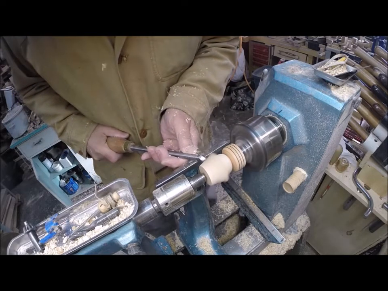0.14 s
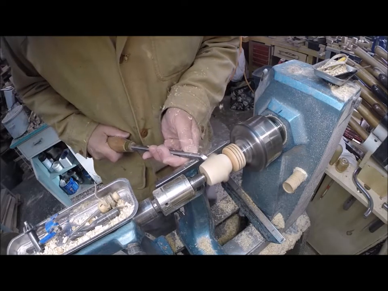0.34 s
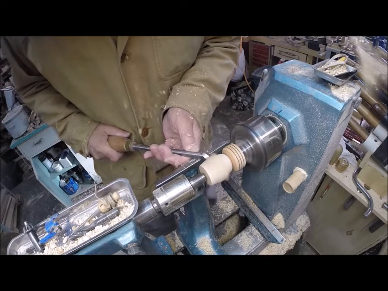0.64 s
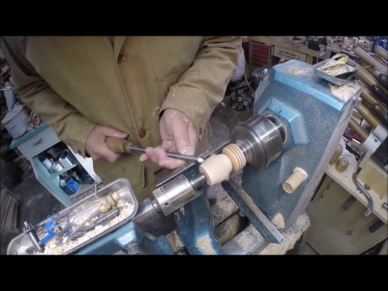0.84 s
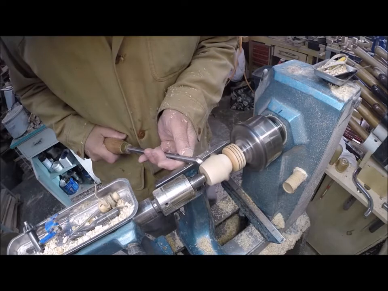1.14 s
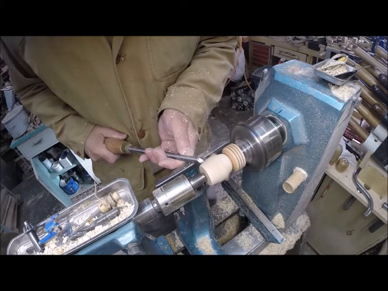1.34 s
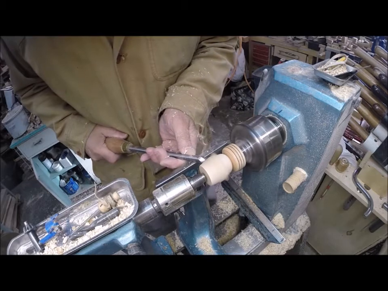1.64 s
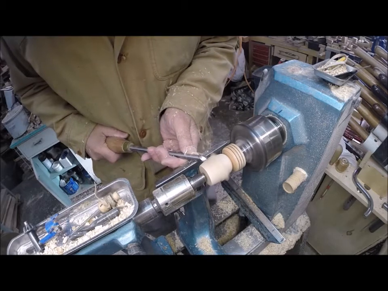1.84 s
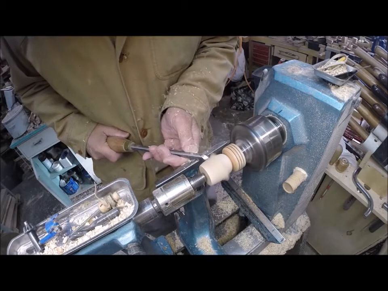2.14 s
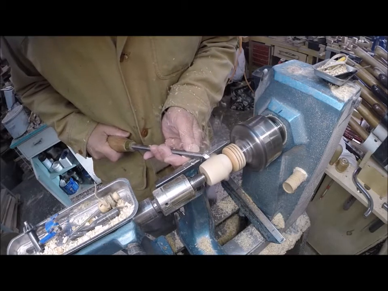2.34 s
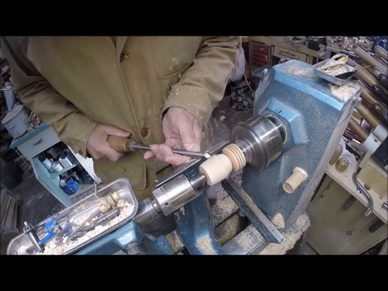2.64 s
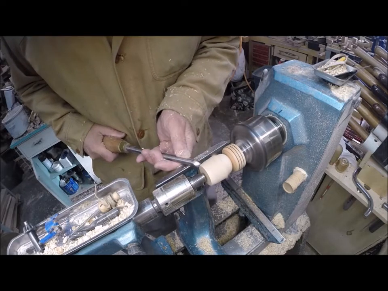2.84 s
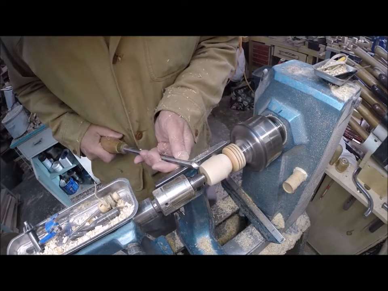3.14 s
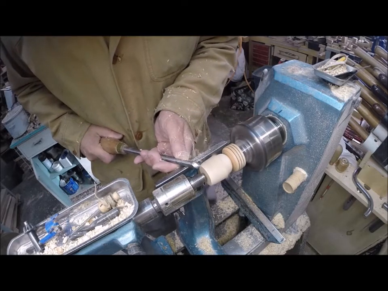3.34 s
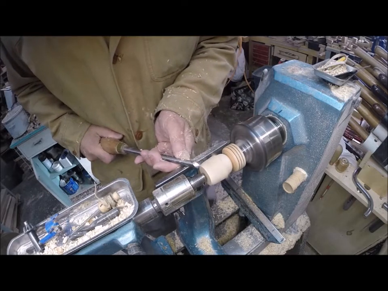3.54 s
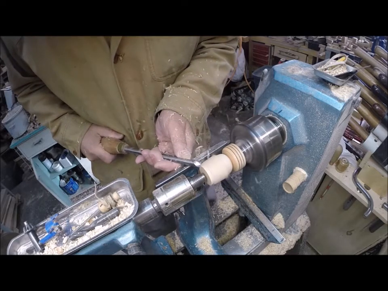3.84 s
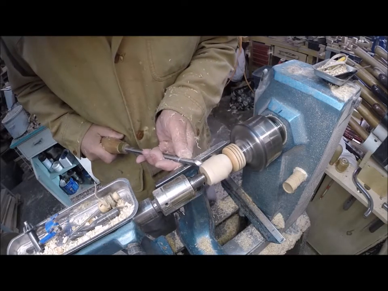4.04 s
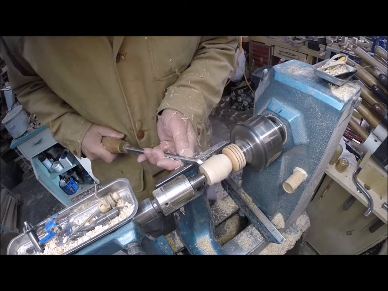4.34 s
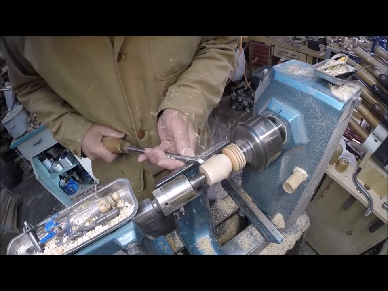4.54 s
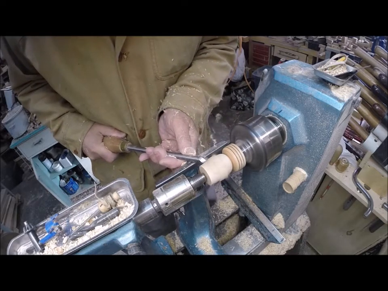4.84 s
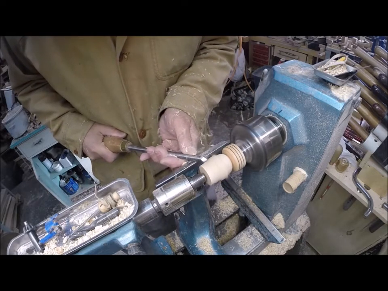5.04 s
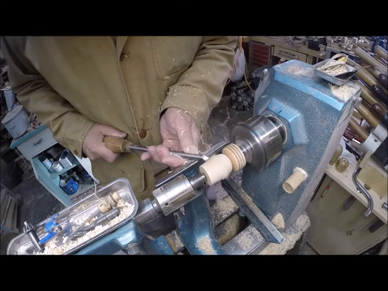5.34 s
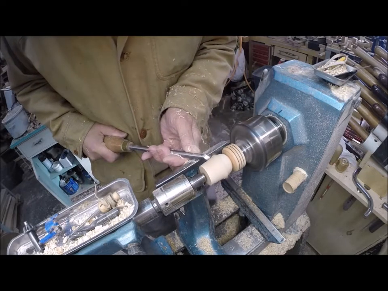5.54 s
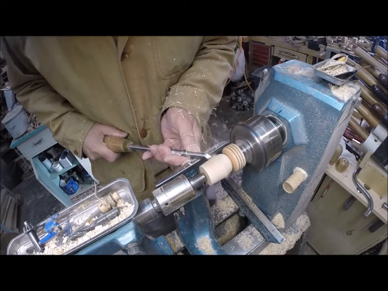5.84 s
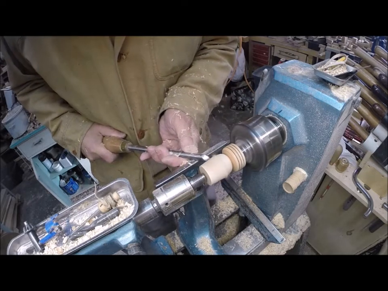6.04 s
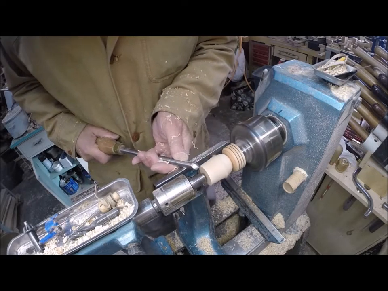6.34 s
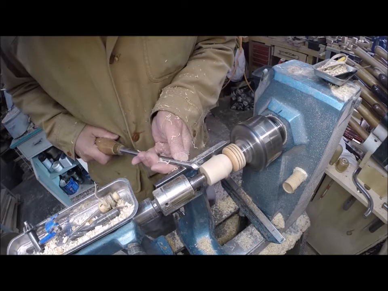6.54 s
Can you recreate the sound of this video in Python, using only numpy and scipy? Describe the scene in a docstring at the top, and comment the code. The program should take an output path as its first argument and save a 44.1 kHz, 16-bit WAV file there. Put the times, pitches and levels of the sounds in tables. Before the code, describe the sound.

Close by in a small workshop, a steel turning tool scrapes into spinning wood with a bright, rapidly pulsing rasp. A brief first cut is followed by a longer one that builds, then a long, sustained third. Each loads the lathe into a low drone and makes the steel ring faintly. Light scuffs and taps of the tool on its rest follow the cuts, while the motor hums and the bearings whirr throughout.

```python
"""A hand-held steel tool takes three cuts from a blank spinning on a wood lathe.
Fibres tear in bursts on every turn and ring the tool and its rest; the load makes the machine drone.
Between cuts the tool is drawn back and knocks on the rest; it also rubs, light and bright, between cuts
and as a cut begins. The tool sounds in a small workshop, over motor hum, bed rumble and bearing whirr."""
import sys
import numpy as np
from scipy import signal
from scipy.fft import rfft, irfft
from scipy.io import wavfile
from scipy.ndimage import uniform_filter1d

SR = 44100
rng = np.random.default_rng(int(sys.argv[2]) if len(sys.argv) > 2 else 0)


def wrap_up_sound(samples):
    """Save the sound to the file named by the first command line argument, as 16-bit audio."""
    columns = np.atleast_2d(samples).T
    # keep every value between -1 and 1, then stretch to whole-number steps
    tamed = np.clip(columns, -1, 1)
    steps = np.round(tamed * 32767).astype(np.int16)
    wavfile.write(sys.argv[1], SR, steps)


N = 294588
T = np.arange(N) / SR
HZ = np.fft.rfftfreq(N, 1 / SR)
TURN_SAMPLES = 1125
SPINDLE_HZ = SR / TURN_SAMPLES
FIRM_DB = -30  # scrape level that stands for firm pressure

# Table levels are relative. x3: one column per cut.
# hand pressure as scrape level, one list per cut: t/s, level/dB
PRESSURE = [
    [(0.0, -42.5), (0.138, -40), (0.416, -32), (0.468, -26.5), (0.594, -31), (0.63, -38.5), (0.668, -40),
     (0.697, -32.5), (0.715, -47.5), (0.77, -58)],
    [(1.06, -57), (1.12, -47), (1.4, -41.5), (1.486, -35.5), (1.832, -32.5), (2.38, -31.5), (2.506, -27),
     (2.556, -36), (2.626, -27.5), (2.73, -60)],
    [(3.29, -53), (3.33, -42.5), (3.5, -34), (3.56, -37), (4.13, -28.5), (5.21, -28), (5.53, -31),
     (5.92, -32), (6.05, -47), (6.1, -63)],
]
# cuts at firm pressure: low rasp/dB, top fizz/dB, drone/dB, high side/turns, opposite bite/dB
CUTS = [(-9.4, -14, -35.4, .1, -6), (-13.6, -17, -35.6, -.028, -6), (-14.6, -18, -37.5, -.115, 0)]
# spectrum of tearing wood: f/Hz, level/dB x3
TEAR_SPECTRUM = [(190.0, -6, -17, -47), (397, -3, -16.5, -16.5), (550.0, -16.5, -16.5, -20),
                 (854, -15.5, -13, -20), (950, -5.5, -7, -10.5), (1730, -3.5, -5, -7.5),
                 (3000.0, 4.5, 0.5, 3.0), (4400.0, 1, -1.5, -0.5), (6570, 1.5, 0.5, 0.5),
                 (7860, -4.5, -7.0, -6.5), (9930, -15, -16.5, -13.5), (11770, -26, -25.5, -24.5),
                 (12800.0, -20.5, -21, -19), (14400.0, -31.5, -32.0, -33), (15200.0, -23.5, -35, -36)]
# resonances and notches of tool and rest: f/Hz, width/Hz, gain/dB x3
STEEL_MODES = [(669, 52, 8, 1.5, 4.5), (1403, 280, 3, 3.5, 5), (1939, 143, 6, 7.5, 9),
               (2144, 120, -4.5, -3.5, -3.5), (2579, 98, 7.5, 11, 10), (2949, 105, 3.5, 4, 2),
               (3330, 247, 4, 6.5, 3.5), (3715, 154, 6.5, 8, 7), (3960, 96, 8.5, 6.5, 8),
               (4276, 134, 4.5, 10, 11), (4569, 280, 9, 12.5, 14), (4862, 136, 5, 3.5, 6),
               (5309, 168, 3, 5.5, 6.5), (5745, 168, 3, 7, 11), (5980, 182, 10.5, 11.5, 11),
               (6390, 245, 7, 8, 2.5), (7114, 294, 6.5, 5, 3.5), (7870, 260, -1, 2, 5),
               (8478, 240, -10, -11, -10.5), (9049, 460, 12, 8.5, 6), (10747, 980, 9, 6.5, 7),
               (13728, 675, 11, 10, 11.5)]
# scrape that recurs each turn: f/Hz, power share/1
GRAIN_REPEAT = [(300, .85), (1300, .72), (2000, .34), (3500, .22), (6000, .2), (12000, .14)]
# colour change as the tool travels along the wood: low f/Hz, high f/Hz, change/dB x3
TRAVEL_BANDS = [(1785, 2200, -0.5, 4.5, 9.5), (2950, 3800, -2, -6, -6), (7050, 8500, -1, 0, -5),
                (13300, 14500, -4, 4, -9)]
# edge catches hard grain: t/s, level/dB
CATCHES = [(0.383, -15.5), (0.4348, -15), (0.4604, -13), (0.4862, -13), (0.5114, -17), (0.588, -17),
           (0.666, -17.5), (1.4515, -20), (1.758, -13.5), (1.81, -16), (1.834, -13), (1.8602, -12.5),
           (1.8861, -16), (1.9365, -14.5), (2.0898, -13.5), (2.141, -13.5), (2.166, -15.5), (2.1923, -15),
           (2.243, -14), (2.269, -15.5), (2.345, -15), (2.3965, -13), (2.4728, -10.5), (2.498, -15),
           (2.5995, -15), (2.6259, -12.5), (4.128, -15), (4.472, -14), (4.538, -11.5), (4.562, -11),
           (4.742, -15), (4.87, -13.5), (5.0225, -13), (5.0737, -13), (5.099, -12.5), (5.4043, -13.5),
           (5.7094, -15)]
# scrape thins to ringing notes: centre t/s, length/s, note level/dB
THIN_SPELLS = [(.613, .026, -35), (.666, .04, -33), (2.575, .036, -33)]
# those notes: f/Hz, level/dB
RING_NOTES = [(2300, -9), (2580, -4), (2960, -8), (3460, -9), (3730, -6), (4665, -4), (5570, -8), (6010, 0),
              (6340, -2), (7170, -10)]
# tool rubs: t/s, length before release/s, level/dB, rise/s, kind ("draw": drawn back; else bright rub)
RUBS = [(0.753, 0.15, -42, 0.054, "draw"), (2.83, 0.076, -42, 0.008, "draw"),
        (3.109, 0.5, -46, .007, "push"), (6.344, 0.07, -51, 0.018, "push"),
        (6.525, 0.11, -40, 0.013, "push")]
# spectrum of the tool drawn back: f/Hz, level/dB
DRAW_SPECTRUM = [(240, -20), (400, -10), (534, -13), (780, -16.5), (1230, -7.5), (2360, -6), (3010, 1.5),
                 (3770, -2), (5190, -16.5), (5600, -5), (6040, -28), (7130, -13), (15000, -41)]
# spectrum of the tool's light, bright rubbing: f/Hz, level/dB
BRIGHT_RUB_SPECTRUM = [(240, -50), (400, -20), (425, -11), (602, -12), (650, -12), (1410, -3), (1610, -5),
                       (2000, 1), (2250, -5), (3010, 2.5), (4460, 3), (7930, -7.5), (8560, -20),
                       (10400, -14.5), (15000, -39)]
# tool knocks on the rest: t/s, level/dB, centre f/Hz
KNOCKS = [(0.821, -24, 3000), (2.8888, -29.5, 3460), (3.122, -23, 4400), (6.266, -29.5, 3240),
          (6.411, -28, 4250)]
# other spindle orders at median load: order/1, level re drone/dB x3
LOAD_ORDERS = [(2, -33, -26, -31), (3, -32, -32, -30), (5, -28, -28, -28), (6, -29, -28, -33),
               (7, -35, -36, -36), (9, -20, -28, -21), (10, -37, -31, -35), (11, -49, -44, -44),
               (13, -41, -39, -37), (17, -33, -43, -36)]
# envelope of the drone's octave: t/s, level/dB
OCTAVE_LEVELS = [(0, -54), (.3, -47), (.5, -44), (.8, -63), (1.15, -62), (1.9, -50.5), (2.55, -48),
                 (2.8, -66), (3.1, -64), (3.22, -52.5), (3.7, -52), (3.9, -58), (4.25, -49), (5.3, -50),
                 (5.8, -53), (6.05, -66), (6.45, -62), (6.6, -55)]
# spectrum of the shaken headstock: f/Hz, level/dB
GROWL_SPECTRUM = [(60, -60), (130, -10), (165, 2.5), (215, -6), (260, -11.5), (300, 6.5), (345, -5.5),
                  (400, -22), (600, -25), (1200, -49)]
# tool digs in: centre t/s, length/s, growl level/dB
DIGS = [(.55, 0.6, -47.5), (2.59, 0.22, -46), (4.947, .7, -62)]
# motor, belt and spindle tones: f/Hz, level/dB, waver/1
IDLE_TONES = [(39.2, -54, .2), (60, -65, .3), (68.2, -66, .2), (79.9, -61, .44), (117.6, -57, .15),
              (120, -62, .2), (135.7, -62, .1), (297, -60, .9), (325.6, -58.5, .12)]
# spectrum of the bed's rumble: f/Hz, level/dB
RUMBLE_SPECTRUM = [(8, -12), (18, 1), (40, -3), (64, 1), (140, -2), (210, -9), (270, -8), (300, -1),
                   (335, -7), (390, -14), (560, -22), (1200, -55)]
# spectrum of bearings and fan: f/Hz, level/dB
WHIRR_SPECTRUM = [(240, -12), (400, -7), (841, -6.5), (921, -2), (1020, -13), (1290, -4), (1520, -6.5),
                  (2030, -4), (2150, -9), (2580, 5.5), (4010, -9.5), (5770, -3), (8180, -20), (9090, -18.5),
                  (15000, -27)]


def cutting(level_db=.4, rub_db=-1, chips_db=-9, catch_db=-10.5, flicker_db=3, sharpen=.42):
    """The bevel rubs all round the turn; chips part in bursts that drive the steel's resonances hard."""
    grain, depth = wood_grain(), bite()
    hand_tremble_db = drift(hz=29.8)
    rub = gain_of(rub_db + hand_tremble_db) * grain * evened(depth ** .33)
    # bands flicker apart: each chip favours its own resonances
    edges_hz = (2700, 3550, 4100, 4420, 5100, 5860, 6200, 6750, 8400, 12000, SR)
    parting = wood_grain()
    chips = sum(band(parting, lo, hi) * evened(depth * gain_of(flicker_db * drift(hz=80)))
                for lo, hi in zip(edges_hz, edges_hz[1:]))
    snaps = band(rng.standard_normal(N), 2000, SR) * bursts(CATCHES, rise_s=.0015, decay_s=.0035)
    sway_db = .3 * drift(hz=4.5)
    thinning = 1 - .75 * sum(spell(at_s, length_s) for at_s, length_s, _ in THIN_SPELLS)
    treble_shelf_db = -6 / (1 + (3000 / (HZ + 1)) ** 4)
    out = np.zeros(N)
    for cut, (rows, (rasp_db, fizz_db, *_)) in enumerate(zip(PRESSURE, CUTS)):
        press_db, during = pressure(rows)
        body_db = spectrum(TEAR_SPECTRUM, cut + 1) + steel_db(cut)
        driven_db = body_db + sharpen * steel_db(cut)
        bevel = colour(rub, body_db + treble_shelf_db)
        scrape = tool_travel(bevel + gain_of(chips_db) * colour(chips, driven_db), cut)
        out += gain_of(level_db) * stroke(scrape, press_db + sway_db, during, rasp_db, fizz_db) * thinning
        filter_rms = np.sqrt(np.mean(gain_of(driven_db) ** 2))
        out += gain_of(catch_db) * colour(snaps * during, driven_db) / filter_rms
    return out


def wood_grain(memory=.88):
    """The edge meets nearly the same grain each turn, giving lines at the spindle orders."""
    snaps = fractures(per_s=7000, spread_db=3.5, dust=.81)
    turns = np.resize(snaps, (N // TURN_SAMPLES + 1, TURN_SAMPLES))
    recurring = signal.lfilter([1], [1, -memory], turns, axis=0)
    recurring = (recurring / recurring.std(axis=1, keepdims=True)).ravel()[:N]
    fresh = fractures(per_s=9000, spread_db=2, dust=.9)
    share = spectrum(GRAIN_REPEAT)
    return irfft(rfft(recurring) * np.sqrt(share) + rfft(fresh) * np.sqrt(1 - share), N)


def fractures(per_s, spread_db, dust):
    """Tiny snaps of uneven size in a haze of dust."""
    sizes = gain_of(spread_db * np.minimum(rng.exponential(1, N), 3)) * rng.choice([-1, 1], N)
    snaps = evened(sizes * (rng.random(N) < per_s / SR))
    return evened(snaps + dust * rng.standard_normal(N))


def bite(side_grain=.23, opposite=.63, uneven_db=1.5, belt_yield_turns_per_db=.007):
    """Cut depth: the edge bites end grain twice a turn, most on the high side, and skims the low side."""
    angle_turns, opposite_db = T * SPINDLE_HZ, np.zeros(N)
    for rows, (*_, high_side_turns, side_db) in zip(PRESSURE, CUTS):
        press_db, during = pressure(rows)
        angle_turns -= during * (high_side_turns + belt_yield_turns_per_db * press_db)
        opposite_db += during * side_db * gain_of(press_db)  # a light touch evens out the two sides

    def lobe(at_turns, rise_turns=.048, fall_turns=.075):
        past_turns = (angle_turns - at_turns + .5) % 1 - .5
        return np.exp(-.5 * (past_turns / np.where(past_turns < 0, rise_turns, fall_turns)) ** 2)

    depth = side_grain + lobe(0) + opposite * gain_of(opposite_db) * lobe(.47)
    clearing = 1 - .75 * lobe(.76)
    return depth * clearing * gain_of(uneven_db * drift(hz=39.7))


def pressure(rows):
    """Hand pressure in dB re firm, and the cut's on/off mask."""
    times_s, db = np.transpose(rows)
    return np.interp(T, times_s, db) - FIRM_DB, (T >= times_s[0]) & (T <= times_s[-1])


def steel_db(cut):
    """Response of tool and rest at one cut's position."""
    return sum(db[cut] / (1 + (2 * (HZ - hz) / width_hz) ** 2) for hz, width_hz, *db in STEEL_MODES)


def tool_travel(sound, cut, wander_db=.7):
    """Bands wander, and grow or fade as the tool moves along the wood."""
    rows = PRESSURE[cut]
    progress = np.interp(T, (rows[0][0], rows[-1][0]), (-.5, .5))
    out = sound.copy()
    for lo_hz, hi_hz, *change_db in TRAVEL_BANDS:
        shift_db = change_db[cut] * progress + wander_db * drift(hz=23)
        out += band(sound, lo_hz, hi_hz) * (gain_of(shift_db) - 1)
    return out


def stroke(sound, press_db, during, rasp_db, fizz_db):
    """One tool stroke: pressure sets the level; low rasp and top fizz grow slower than the mid band."""
    bands = [(0, 2300, rasp_db + .82 * press_db),
             (2300, 7500, press_db),
             (7500, SR, fizz_db + .78 * press_db)]
    out = np.zeros(N)
    for lo_hz, hi_hz, db in bands:
        part = band(sound, lo_hz, hi_hz)
        out += part / part[during].std() * gain_of(FIRM_DB + db)
    return out * uniform_filter1d(during * 1., size=500)


def ringing(mode_hz=2588, firm_level_db=-42.5):
    """The rest's longest-lived mode sings between bites; a few notes stand out where the scrape thins."""
    force = sum(during * gain_of(press_db) for press_db, during in map(pressure, PRESSURE))
    mode = tone(mode_hz, waver=.9, waver_hz=36)
    notes = evened(sum(gain_of(db) * tone(hz, waver=.9, waver_hz=55) for hz, db in RING_NOTES))
    spells = sum(gain_of(db) * spell(at_s, length_s) for at_s, length_s, db in THIN_SPELLS)
    return gain_of(firm_level_db) * force ** .8 * mode + spells * notes


def rubbing(level_db=-2, judder_db=2, swell_db_per_s=11, release_db_per_s=170):
    """The tool is drawn back after a cut, or rubs light and bright between cuts and as a cut begins."""
    rub = fractures(per_s=3000, spread_db=2.5, dust=.8) * gain_of(judder_db * drift(hz=69.6))
    modes_db = .4 * steel_db(cut=1)
    drawn = colour(rub, spectrum(DRAW_SPECTRUM) + modes_db)
    bright = colour(rub, spectrum(BRIGHT_RUB_SPECTRUM) + modes_db)
    out = np.zeros(N)
    for start_s, length_s, db, rise_s, kind in RUBS:
        sound, rasp_db, fizz_db = (drawn, -8, -21.5) if kind == "draw" else (bright, -14.5, -13.5)
        age_s = np.maximum(T - start_s, 0)
        release_db = release_db_per_s * np.maximum(age_s - length_s, 0)
        press_db = db - FIRM_DB + swell_db_per_s * age_s - release_db
        during = (age_s > 0) & (age_s < 2 * length_s)
        out += np.minimum(age_s / rise_s, 1) * stroke(sound, press_db, during, rasp_db, fizz_db)
    return gain_of(level_db) * out


def knocking(level_db=-11):
    """Short scuffs as the tool is set down on the rest."""
    out, grit = np.zeros(N), rng.standard_normal(N)
    for at_s, db, centre_hz in KNOCKS:
        body_db = .8 * steel_db(cut=1) - 13 * np.log2((HZ + 1) / centre_hz) ** 2
        scuff = evened(irfft(rfft(grit) * gain_of(body_db), N))
        out += scuff * bursts([(at_s, db)], rise_s=.005, decay_s=.011)
    return gain_of(level_db) * out


def drone(growl_db=-55):
    """Cutting force shakes the lathe at the spindle orders; the fourth meets a resonance of the bed."""
    load = machine_load()
    fourth = tone(4 * SPINDLE_HZ, waver=.04, waver_hz=25)
    others = sum(gain_of(by_cut(db)) * tone(order * SPINDLE_HZ, waver=.15, waver_hz=14)
                 for order, *db in LOAD_ORDERS)
    others *= (load / np.median(load)) ** .31  # these grow faster than the fourth
    # beats against the motor tone just above it
    octave = tone(8 * SPINDLE_HZ, waver=.08, waver_hz=10)
    octave *= gain_of(np.interp(T, *np.transpose(OCTAVE_LEVELS)))
    digs = sum(gain_of(db) * spell(at_s, length_s) for at_s, length_s, db in DIGS)
    growl = noise(spectrum(GROWL_SPECTRUM)) * (gain_of(growl_db) * load / load.max() + digs)
    return load * (fourth + others) + growl + octave


def machine_load(free_db=-52.5, bite_db=-43.5, lag_s=.072, follow_db_per_db=.63, skim_db_per_db=5.6):
    """Shaking follows pressure, slightly late; below bite_db the edge skims and it falls away."""
    force = np.zeros(N)
    for rows, (_, _, drone_db, *_) in zip(PRESSURE, CUTS):
        press_db, during = pressure(rows)
        skim_db = np.maximum(bite_db - FIRM_DB - press_db, 0)
        force += during * gain_of(drone_db + follow_db_per_db * press_db - skim_db_per_db * skim_db)
    return gain_of(free_db) + np.interp(T - lag_s, T, uniform_filter1d(force, size=4000))


def motor(rumble_db=-55.3, whirr_db=-51, throb=.2):
    """Free-running lathe: tones, bed rumble, and bearing whirr that throbs with the spindle."""
    tones = sum(gain_of(db) * tone(hz, waver, waver_hz=4) for hz, db, waver in IDLE_TONES)
    rumble = gain_of(rumble_db) * noise(spectrum(RUMBLE_SPECTRUM))
    whirr = gain_of(whirr_db) * noise(spectrum(WHIRR_SPECTRUM) + .3 * steel_db(cut=2))
    whirr *= 1 + throb * np.sin(2 * np.pi * SPINDLE_HZ * T)
    return tones + rumble + whirr


def workshop(x, t60_s=.039, wet_db=-12):
    """A cluttered room adds a short, weak tail of sparse reflections."""
    t = T[:SR // 2]
    taps = rng.standard_normal(len(t)) * (rng.random(len(t)) < .06)
    taps *= (t > .004) * gain_of(-60 * t / t60_s)
    return x + gain_of(wet_db) * signal.fftconvolve(x, taps / np.linalg.norm(taps))[:N]


def gain_of(db):
    """dB to amplitude."""
    return 10 ** (np.asarray(db) / 20)


def evened(x):
    """Scale to rms 1."""
    return x / np.sqrt(np.mean(x ** 2) + 1e-20)


def spectrum(rows, column=1):
    """Table column interpolated over log frequency."""
    table = np.array(rows, float)
    return np.interp(np.log(HZ + 1), np.log(table[:, 0]), table[:, column])


def colour(x, db):
    """Minimum-phase filter: resonances ring after each click."""
    log_gain = np.log(gain_of(np.maximum(db, db.max() - 100)))
    cepstrum = irfft(log_gain, N)
    cepstrum[1:N // 2] *= 2
    cepstrum[N // 2 + 1:] = 0
    return irfft(rfft(x) * np.exp(rfft(cepstrum)), N)


def band(x, lo_hz, hi_hz):
    """Brick-wall band-pass."""
    return irfft(rfft(x) * ((HZ >= lo_hz) & (HZ < hi_hz)), N)


def noise(shape_db):
    """Coloured noise, rms 1."""
    return evened(colour(rng.standard_normal(N), shape_db))


def drift(hz, points=8192):
    """Slow random signal, rms 1, rolling off at hz."""
    rates_hz = np.fft.rfftfreq(points, T[-1] / points)
    slow = irfft(rfft(rng.standard_normal(points)) * np.exp(-(rates_hz / hz) ** 2), points)
    return np.interp(T, np.linspace(0, T[-1], points), evened(slow))


def tone(hz, waver, waver_hz):
    """Tone wavering in level and phase, rms 1."""
    carrier = np.exp(2j * np.pi * (hz * T + rng.random()))
    wobble = drift(waver_hz) + 1j * drift(waver_hz)
    return evened((carrier * (1 + waver * wobble)).real)


def bursts(rows, rise_s, decay_s):
    """Envelope with a linear rise and exponential decay at each (t/s, level/dB)."""
    out = np.zeros(N)
    for peak_s, db in rows:
        age_s = np.maximum(T - peak_s + rise_s, 0)
        decay = np.exp(-np.maximum(age_s - rise_s, 0) / decay_s)
        out += gain_of(db) * np.minimum(age_s / rise_s, 1) * decay
    return out


def spell(centre_s, length_s):
    """Smooth flat-topped window."""
    return np.exp(-(2 * (T - centre_s) / length_s) ** 4)


def by_cut(values):
    """Hold one value per cut, glide between cuts."""
    edges_s = [rows[end][0] for rows in PRESSURE for end in (0, -1)]
    return np.interp(T, edges_s, np.repeat(values, 2))


def scene():
    """Tool sounds in the room, over the machine; mono."""
    tool = cutting() + ringing() + rubbing() + knocking()
    return (workshop(tool) + drone() + motor())[None]


def record(dry):
    """Low-pass at 15.4 kHz."""
    taps = signal.firwin(511, 15400, window=("kaiser", 9), fs=SR)
    return signal.oaconvolve(dry, taps[None], "same")


dry = scene()
out = record(dry)
wrap_up_sound(out)
```